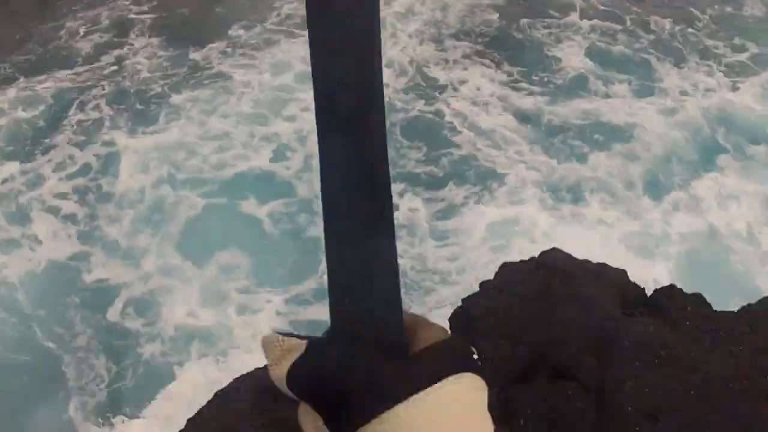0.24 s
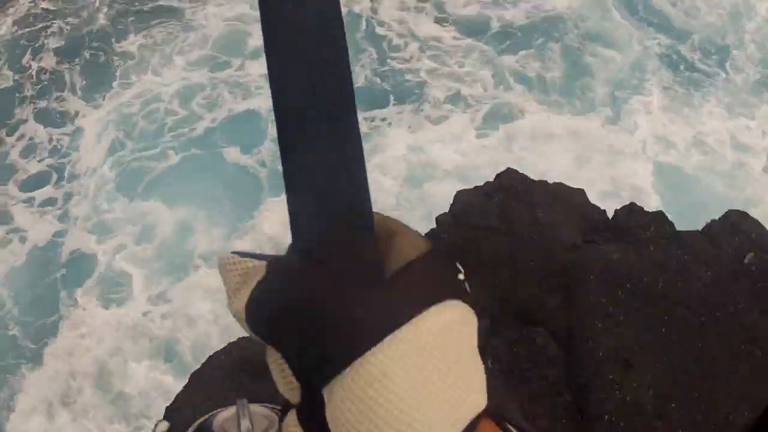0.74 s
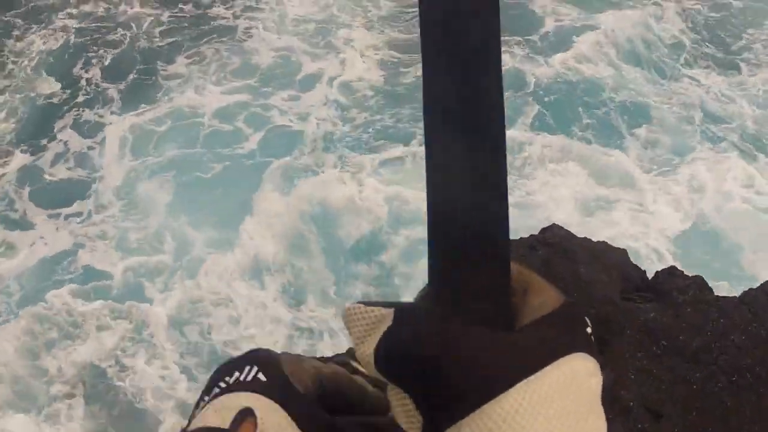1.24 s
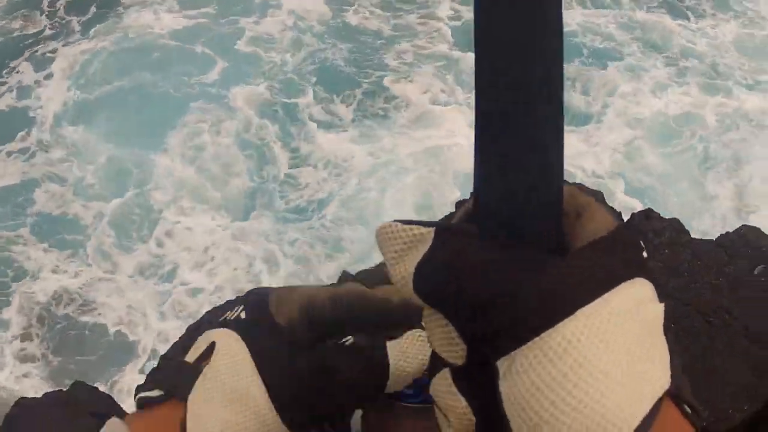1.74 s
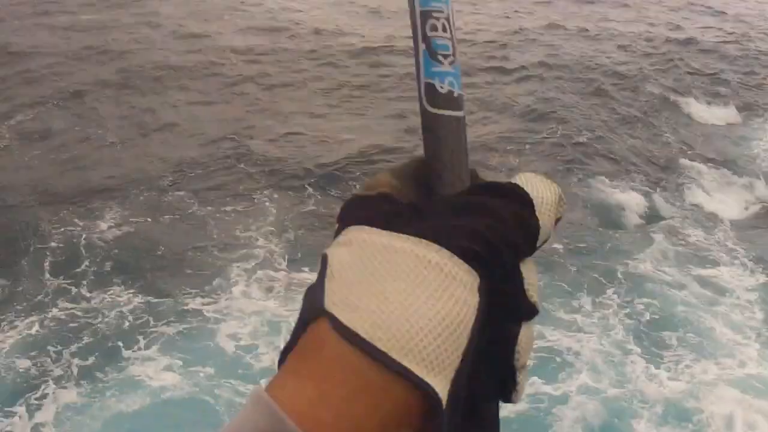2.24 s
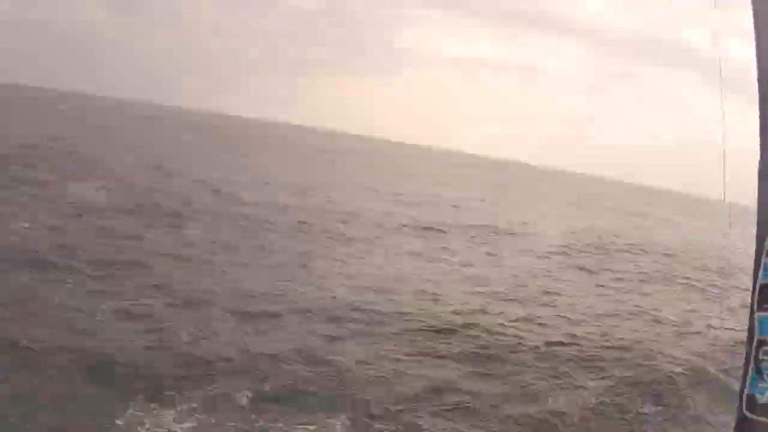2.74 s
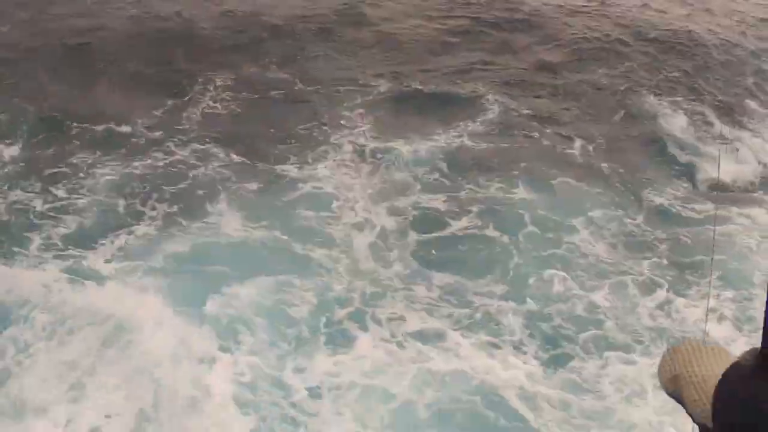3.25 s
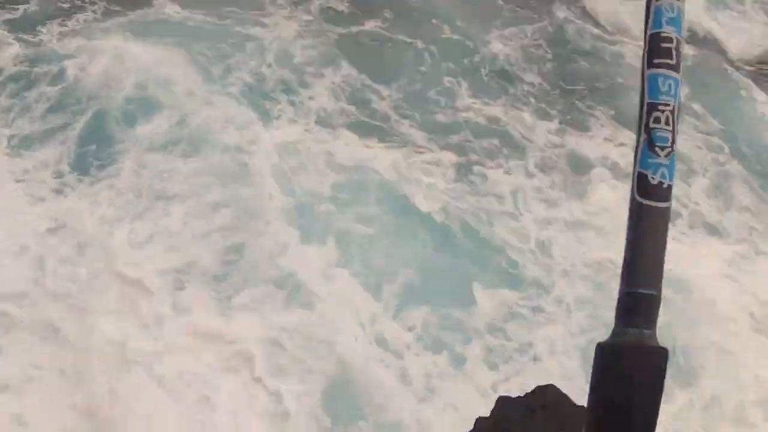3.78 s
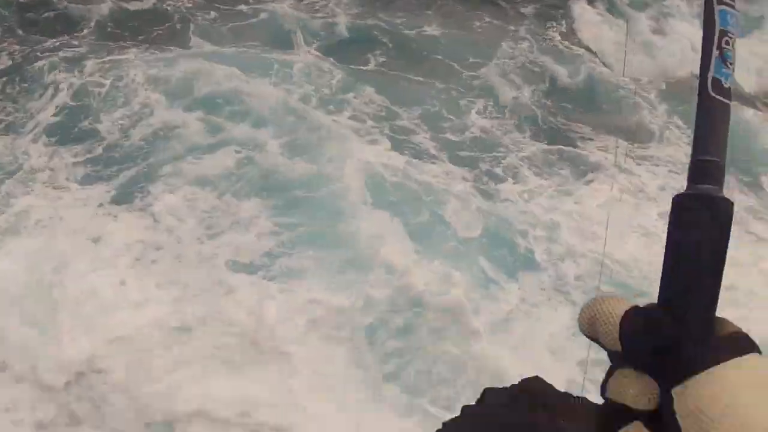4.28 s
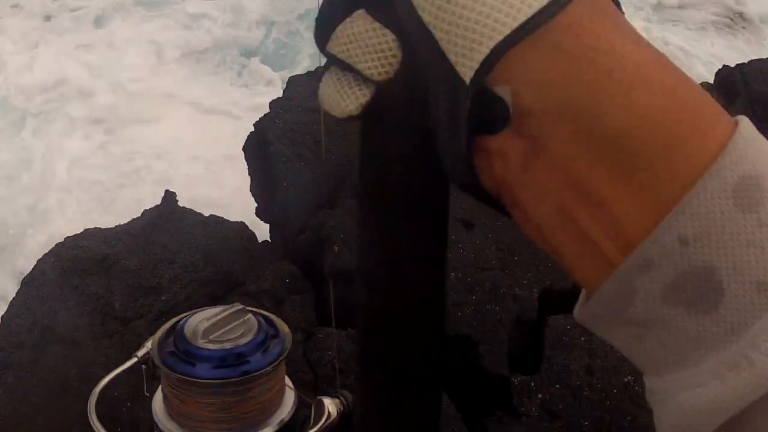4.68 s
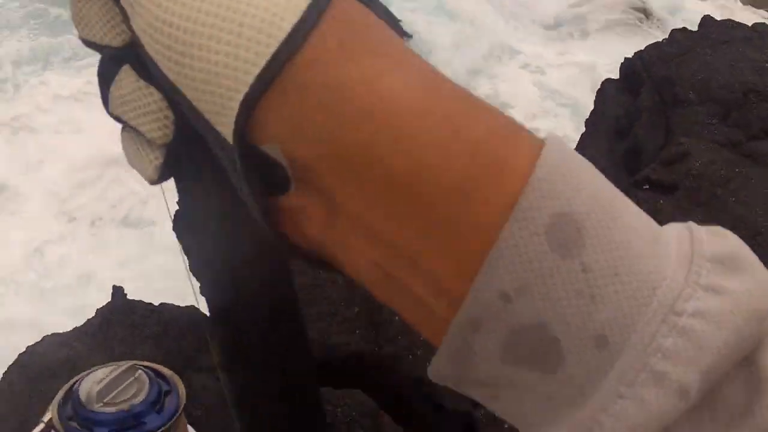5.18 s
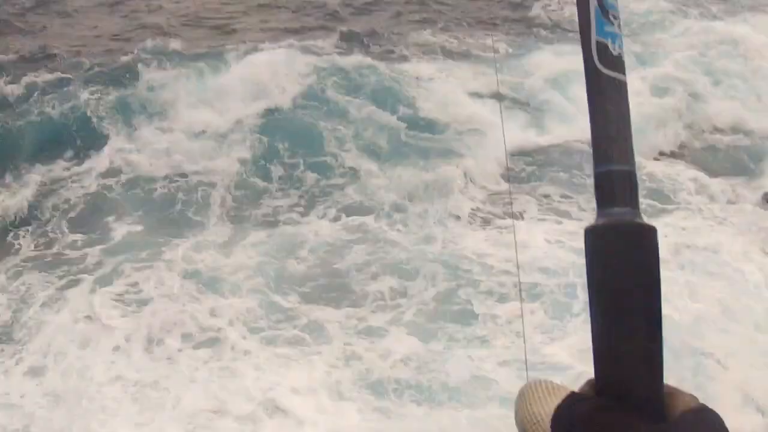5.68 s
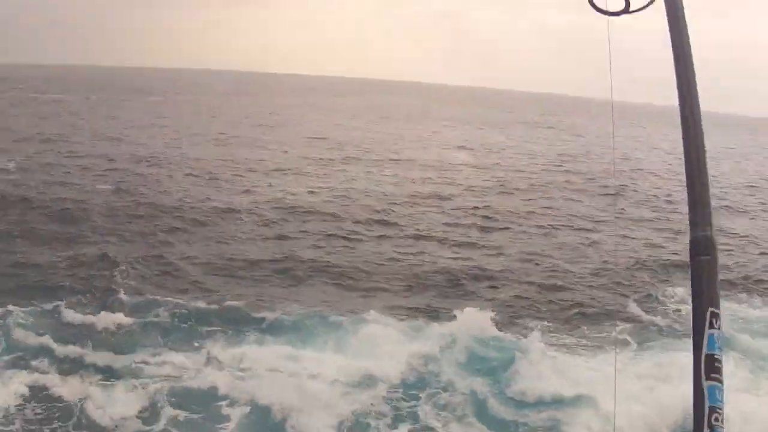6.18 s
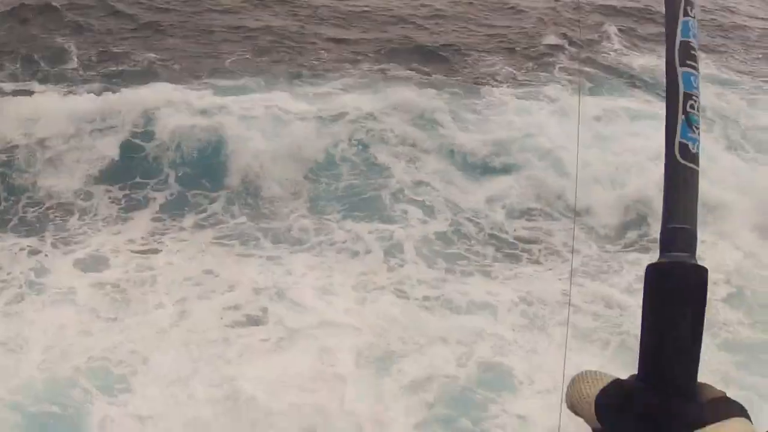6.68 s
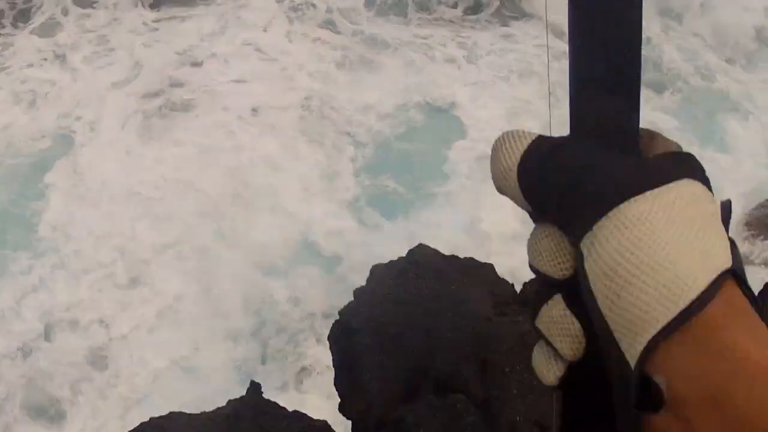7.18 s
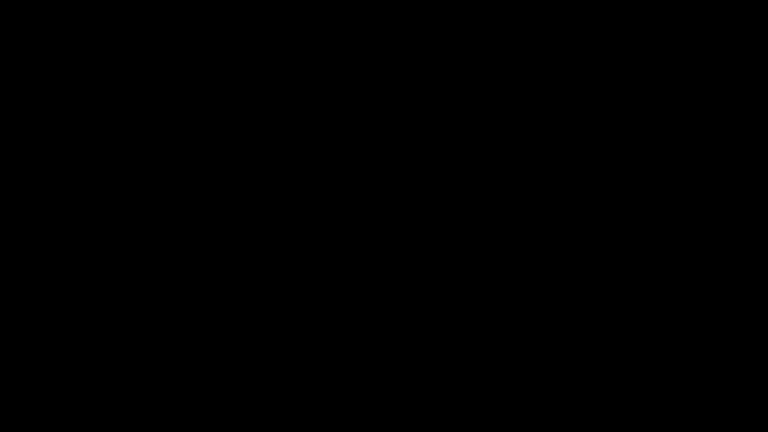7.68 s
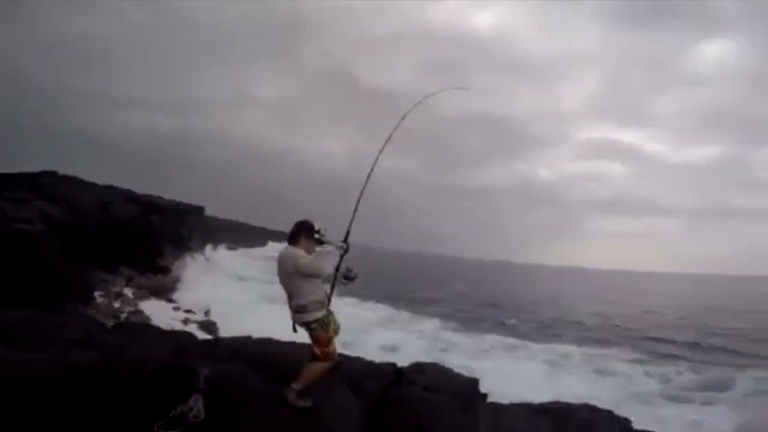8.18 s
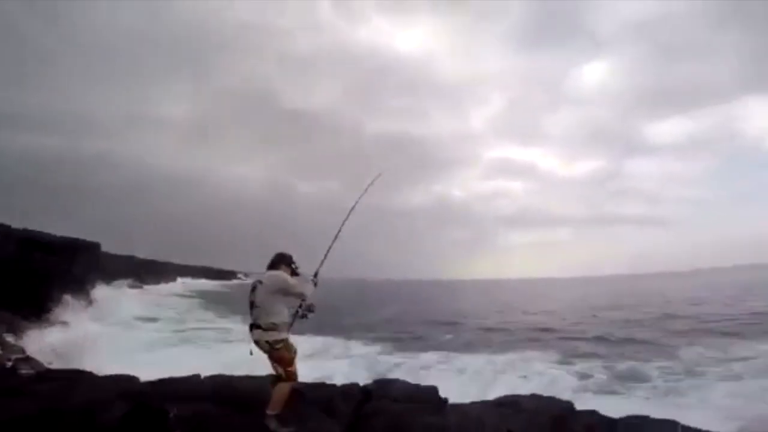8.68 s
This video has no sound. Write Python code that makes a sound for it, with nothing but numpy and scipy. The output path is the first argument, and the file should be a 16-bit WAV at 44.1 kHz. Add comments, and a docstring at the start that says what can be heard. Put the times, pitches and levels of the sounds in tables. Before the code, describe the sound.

Close, irregular knocks and rattles of a plastic camera case sound over churning, foaming sea as a fishing rod is handled on the rocks. The reel ticks lightly, a glove rubs and a breeze rumbles on the microphone. Then an abrupt change to a second microphone further back brings heavy low gusts over muffled surf, two thin whirrs and some close taps, ending with a rod swishing through the air.

```python
"""Rocky shore, microphone inside the plastic case of a camera worn by an angler. The surf just below
draws back, then slowly builds, as churning water and hissing foam. Right at the microphone the case
knocks and rattles on its mount as the rod is handled; the reel ticks and a light wind rumbles.
At 7.7 s we cut to a second camera on the rocks, further from the water: duller surf, hard wind
buffets, a thin whirr, a few taps and, at the very end, the swish of a cast."""
import sys
import numpy as np
from scipy import signal
from scipy.fft import rfft, irfft, next_fast_len
from scipy.io import wavfile
from scipy.ndimage import uniform_filter1d

SR = 44100
rng = np.random.default_rng(int(sys.argv[2]) if len(sys.argv) > 2 else 0)


def put_to_file(sound):
    """Save the sound as 16-bit audio at rate SR, in the file named by the first command-line argument."""
    columns = np.atleast_2d(sound).T  # one column per channel
    safe = np.clip(columns, -1, 1)
    whole_steps = np.round(safe * 32767)
    wavfile.write(sys.argv[1], SR, whole_steps.astype(np.int16))


N = 393807

# near surf drawing back and building: t/s, churn level/dB, foam level/dB
SURF_LEVELS = [(0.3, -56.5, -54.5), (0.6, -59, -56.5), (1.6, -58.5, -58), (3.3, -57, -57),
               (4.4, -56, -55.5), (5.15, -54.5, -53.2), (6.3, -53.6, -52.6), (7.25, -51.5, -50.5),
               (7.69, -52.6, -51.8)]
# spectrum of the near surf: f/Hz, level/dB
SURF_COLOUR = [(20, -25), (60, -27), (100, 5), (330, 2), (600, -8), (1000, -8.5), (1500, -4), (2600, -2.5),
               (4200, -12), (9000, -18.5), (12000, -18.5), (15000, -18)]
# peaks and notches of the worn camera's case: f/Hz, width/Hz, gain/dB
WORN_CASE = [(1276, 136, 6), (1827, 220, 4.3), (2285, 190, 6.3), (2900, 140, 2.5), (3130, 130, 3),
             (3704, 63, 5.5), (4080, 425, -7.5), (6000, 573, -17), (7830, 300, -8.5), (9870, 1670, 9),
             (11900, 2360, -15.5), (14000, 990, 6)]
# spectrum of the surf from further back: f/Hz, level/dB
FAR_SURF_COLOUR = [(60, 9), (250, 3.5), (600, -2), (1100, -3), (2200, 1), (3300, 0.5), (4300, -1.5),
                   (4900, -11), (6500, -11.5), (9500, -17), (12000, -22.5), (15000, -28)]
# resonances of the camera on the rocks: f/Hz, width/Hz, gain/dB
ROCK_CASE = [(830, 150, 2), (1442, 116, 10), (1930, 100, 5.5), (2680, 110, 3), (3980, 410, 0.5),
             (5350, 500, 5.5)]
# thin whirrs: middle t/s, level over the surf/dB
WHIRR_SWELLS = [(8.02, 8.5), (8.39, 6)]
# the case knocking on its mount: t/s, relative clack level/dB, relative thud level/dB
CASE_KNOCKS = [(0.0554, -25, -28.5), (.1845, -30.5, -24.5), (.1975, -30.5, -38), (.262, -25, -30),
               (.271, -22, -25.5), (0.3204, -35, -25), (.3826, -28, -32), (0.3963, -31, -30.5),
               (0.8289, -30.5, -35.5), (0.8495, -29, -31.5), (1.1097, -37, -39.5), (2.2971, -31, -35.5),
               (2.499, -30.5, -30.5), (3.088, -28.5, -34.5), (3.1805, -28.5, -32.5), (3.2336, -39.5, -37),
               (3.295, -36.5, -43), (3.3957, -27, -33.5), (3.5454, -28.5, -29.5), (3.6485, -29, -31),
               (3.7194, -36.5, -28), (3.9026, -35.5, -40), (4.1556, -18.5, -23.5), (4.2513, -38, -34),
               (4.2874, -32.5, -37), (5.7118, -30, -34), (5.7294, -27, -28), (5.8435, -37, -30),
               (5.9204, -22.5, -27), (5.927, -18.5, -20.5), (6.2323, -28.5, -30), (6.5365, -29.5, -40),
               (6.582, -34, -30.5), (6.6334, -22, -24.5), (6.6967, -33.5, -30), (6.7484, -27.5, -30),
               (6.9001, -34, -42), (7.0752, -28.5, -35), (7.092, -25, -26), (7.1618, -33.5, -26),
               (7.283, -23.5, -26.5), (7.3483, -39, -30.5), (7.4016, -32.5, -43), (7.4744, -34.5, -42),
               (7.6111, -34, -40.5)]
# spectrum of a clack: f/Hz, level/dB
CLACK_COLOUR = [(300, -22), (640, -25), (810, -1), (1130, -4), (1400, 1), (1780, -6), (2200, -0.5),
                (2500, -13.5), (3200, -20.5), (4200, -30.5), (8000, -41), (9800, -17.5), (11500, -21),
                (14200, -20.5)]
# ringing and notches of the knocked plastic shell: f/Hz, width/Hz, gain/dB
SHELL_MODES = [(930, 210, 0.5), (1416, 89, 2), (2060, 300, 1.5), (6000, 2000, -8), (9930, 220, 4.5),
               (11400, 380, -18), (11800, 90, 9), (12000, 330, -14), (12280, 90, 8), (12500, 380, -16),
               (14130, 200, 7), (15000, 530, -15)]
# the body shoving the camera: t/s, level/dB, f/Hz
BODY_SHOVES = [(0.107, -12, 42), (0.226, -24, 34), (.79, -32, 35.3), (1.29, -34, 41), (2.221, -28.5, 29.8),
               (2.461, -29, 31.4), (3.85, -28, 32), (5.838, -31, 70), (5.885, -20, 26.5), (6.573, -15, 29),
               (6.608, -19, 35.4)]
# the glove rubbing along the rod: t/s, length/s, level/dB
GLOVE_RUBS = [(.062, 0.039, -41.5), (.19, 0.042, -37), (.32, 0.028, -40), (.41, 0.087, -47.5),
              (.87, .035, -47), (2.62, 0.054, -43.5), (3.82, 0.065, -45.5), (5.845, .05, -37.5)]
# spectrum of a rub: f/Hz, level/dB
RUB_COLOUR = [(100, -9), (300, -0.5), (620, -24), (1300, -11), (2100, 2), (3000, -41), (6000, -34),
              (10000, -19), (12000, -28), (14200, -25)]
# light metal ticks of the reel: t/s, level/dB
REEL_TICKS = [(.367, -35), (0.435, -48.5), (.514, -36.5), (0.636, -47.5), (7.051, -32)]
# spectrum of a tick: f/Hz, level/dB
TICK_COLOUR = [(1500, -33), (2600, -13), (3050, 7), (3400, -9), (3650, -5.5), (4200, -17), (5100, 3.5),
               (6000, -24), (7000, 0), (7900, -29), (8900, -5), (12000, -32)]
# the reel's metal ringing on: f/Hz, level against the tick/dB, t60/s
REEL_MODES = [(3000, -9.5, 0.18), (5160, -16, 0.18), (6760, -15, 0.16), (8995, -19, .15)]
# spectrum of the rod's swish: f/Hz, level/dB
SWISH_COLOUR = [(350, -24), (520, -0.5), (1050, 3.5), (1450, -5), (1800, 0), (2300, -11), (2750, 3),
                (3200, -14), (3800, 1), (4350, -2), (5200, -20.5), (7000, -24.5), (10500, -25),
                (15000, -31)]
# taps close to the camera on the rocks: t/s, level/dB
CLOSE_TAPS = [(8.1008, -26), (8.318, -27.5), (8.559, -36), (8.578, -24.5)]
# spectrum of a tap: f/Hz, level/dB
TAP_COLOUR = [(120, 7.5), (300, 1), (600, -3), (950, 8), (1400, -15), (2100, -3), (2800, -9), (5000, -17),
              (14000, -48)]
# hard wind buffets on the rocks: t/s, level/dB
GALE_BUFFETS = [(7.74, -21.5), (7.84, -13.5), (7.96, -19.5), (8.055, -16.5), (8.122, -14.5), (8.245, -15.5),
                (8.32, -13), (8.599, -14), (8.7, -12.5), (8.77, -17), (8.832, -13.5), (8.92, -14.5)]
# spectrum of the hard wind: f/Hz, level/dB
GALE_COLOUR = [(10, -1.5), (22, 1.5), (35, 2.5), (48, -5.5), (70, -18), (110, -28.5), (200, -40),
               (500, -63), (2000, -92)]
# gusts slapping the camera on the rocks: t/s, length/s, level/dB
GUST_SLAPS = [(8.303, 0.016, -26), (8.826, 0.028, -27), (8.88, 0.031, -25.5)]
# spectrum of a slap: f/Hz, level/dB
SLAP_COLOUR = [(40, -7), (110, 1), (200, -9.5), (400, -29.5), (1500, -24.5), (6000, -62)]
# light wind on the worn case, with its lulls: t/s, level/dB
BREEZE_LEVELS = [(0, -35), (.22, -28.5), (.64, -49), (.95, -42), (1.75, -44.5), (2.3, -39.5), (2.8, -47),
                 (3.15, -36), (4.95, -42.5), (5.27, -36), (5.45, -52), (5.85, -36), (6.35, -41),
                 (7.69, -39)]
# spectrum of the light wind: f/Hz, level/dB
BREEZE_COLOUR = [(10, -3), (22, 4.5), (36, -0.5), (55, -12.5), (90, -17), (160, -29), (400, -44),
                 (1500, -90)]

CUT_S = 7.696  # from the worn camera to the one on the rocks
LEAD_S = 0.015  # run-up of a clack before its blow


def near_surf():
    """Just below the angler, white water churns in the middle range and foam hisses on top."""
    t, hz = frames()
    colour = spectrum(SURF_COLOUR, hz) + bells(WORN_CASE, hz)
    foam = np.clip((hz - 2200) / 2200, 0, 1)
    level = (1 - foam) * curve(SURF_LEVELS, t) + foam * curve(SURF_LEVELS, t, column=2)
    return churn(colour + level, patchy_db=0.54, flicker_db=0.62)


def far_surf(level_db=-57.5, whirr_hz=3870, sag_hz_per_s=1600, width_hz=540, spread_s=0.22):
    """The same sea from further back, steady; a thin whirr rises out of it twice, sinking in pitch."""
    t, hz = frames()
    whirrs = [(whirr_hz - sag_hz_per_s * (t - s), width_hz, db * np.exp(-((t - s) / spread_s) ** 2))
              for s, db in WHIRR_SWELLS]
    colour = spectrum(FAR_SURF_COLOUR, hz) + bells(ROCK_CASE, hz)
    return churn(colour + bells(whirrs, hz) + level_db, patchy_db=1.6, flicker_db=0.56)


def churn(field_db, patchy_db, flicker_db, size=512):
    """Water noise on a time-frequency grid: patches of bursting foam and quick, wide-band splashes."""
    real, imag, patches, splashes = rng.standard_normal((4,) + field_db.shape)
    patches = unit_rms(uniform_filter1d(uniform_filter1d(patches, size=26, axis=0), size=7, axis=1))
    splashes = unit_rms(uniform_filter1d(uniform_filter1d(splashes, size=4, axis=0), size=50, axis=1))
    water = (real + 1j * imag) * gain_of(field_db + patchy_db * patches + flicker_db * splashes)
    return signal.istft(water.T, nperseg=size, noverlap=size - size // 4)[1][:N]


def knocks(thud_boost_db=4, thud_hz=265.4, thud_t60=0.066):
    """Right at the microphone, each knock clacks the shell and sets the camera ringing low on its mount."""
    out, t = np.zeros(N), np.arange(SR // 6) / SR
    for s, clack_db, thud_db in contacts():
        hit = clack(CLACK_COLOUR, contact_s=0.0011, rattle_db=-10, rattle_s=0.0094)
        add(out, s - LEAD_S, gain_of(clack_db) * hit)
        softness = 1 + 0.0085 * min(clack_db - thud_db, 0)  # soft blows ring lower
        hz = thud_hz * rng.uniform(0.94, 1.034) * softness
        thud = np.sin(2 * np.pi * hz * t) * gain_of(-60 * t / thud_t60)
        add(out, s - 0.0006, -gain_of(thud_db + thud_boost_db) * thud)
    return out


def contacts(touch_db=-12.5, touch_lead_s=0.014):
    """Case and mount meet twice each time: a light first touch, then the knock."""
    for s, clack_db, thud_db in CASE_KNOCKS:
        yield s - touch_lead_s, clack_db + touch_db, thud_db + touch_db
        yield s, clack_db, thud_db


def clack(colour, contact_s, rattle_db, rattle_s):
    """Hard parts chatter for a moment, then buzz faintly; the blow comes at LEAD_S, at level one."""
    t = np.arange(SR // 10) / SR - LEAD_S
    since = np.maximum(t, 0) / contact_s
    chatter = rfft((since * np.exp(1 - since)) ** 2 * rng.standard_normal(len(t)))
    blow = irfft(chatter / (abs(chatter) + 1e-9) ** 0.49, len(t))  # a hard blow has a flatter spectrum
    blow_level = np.sqrt(uniform_filter1d(blow ** 2, size=60).max())
    buzz = np.exp(np.minimum(t / 0.003, -t / rattle_s)) * rng.standard_normal(len(t))
    sound = coloured(blow + gain_of(rattle_db) * blow_level * buzz, colour)
    return sound / np.sqrt(uniform_filter1d(sound ** 2, size=90).max())


def sways(level_db=-35.5, hz=27, lead_s=0.019, width_s=0.021):
    """Before each knock the case swings out and back towards its stop."""
    out, t = np.zeros(N), np.arange(-SR // 16, SR // 16) / SR
    swing = -gain_of(level_db) * np.exp(-(t / width_s) ** 2) * np.sin(2 * np.pi * hz * t)
    for s, *_ in CASE_KNOCKS:
        add(out, s - lead_s + t[0], swing)
    return out


def shoves(decay_s=0.012):
    """A soft shove of the body rocks the case for a cycle or two."""
    out, t = np.zeros(N), np.arange(SR // 4) / SR
    push = t / decay_s * np.exp(1 - t / decay_s)
    for s, db, hz in BODY_SHOVES:
        add(out, s, -gain_of(db) * push * np.sin(2 * np.pi * hz * t))
    return out


def puffs(rows, colour, rough_db):
    """Short swells of uneven noise, from cloth that slips or air that tumbles."""
    out = np.zeros(N)
    for s, length, db in rows:
        count = max(int(length * SR), 256)
        slips = gain_of(rough_db * unit_rms(uniform_filter1d(rng.standard_normal(count), size=100)))
        sound = unit_rms(coloured(slips * rng.standard_normal(count), colour)[:count])
        add(out, s, gain_of(db) * sound * signal.windows.tukey(count, 0.5))
    return out


def reel():
    """Within arm's reach the reel ticks, and each tick leaves a faint metallic ring."""
    out = hits(REEL_TICKS, TICK_COLOUR, contact_s=0.0025, rattle_db=-8.5, rattle_s=0.028)
    t = np.arange(SR // 4) / SR
    ring = sum(gain_of(db - 60 * t / t60) * np.sin(2 * np.pi * hz * t) for hz, db, t60 in REEL_MODES)
    for s, db in REEL_TICKS:
        add(out, s, gain_of(db) * ring)
    return out


def hits(rows, colour, contact_s, rattle_db, rattle_s):
    """Small hard contacts of one object, close and dry."""
    out = np.zeros(N)
    for s, db in rows:
        add(out, s - LEAD_S, gain_of(db) * clack(colour, contact_s, rattle_db, rattle_s))
    return out


def cast(peak_s=8.921, peak_db=-21, rise_db_per_s=392, fall_db_per_s=700):
    """Heard from the rocks, air tears round the rod and line as the swing gathers speed."""
    t = np.arange(N) / SR - peak_s
    air = steady_noise(lambda hz: spectrum(SWISH_COLOUR, hz) + bells(ROCK_CASE, hz))[:N]
    level = peak_db + np.minimum(rise_db_per_s * t, -fall_db_per_s * t)
    return air * gain_of(np.maximum(level, -120))


def wind(gusts, colour, steadiness):
    """Eddies push on the microphone, following the gusts; steadiness (0 to 1) evens out their flutter."""
    eddies = steady_noise(lambda hz: spectrum(colour, hz))
    flutter = uniform_filter1d(abs(signal.hilbert(eddies)), size=1900)
    return unit_rms(eddies / flutter ** steadiness)[:N] * gusts


def gale_strength(steady_db=-26.5, rise_s=0.02, fall_s=0.045):
    """On the rocks, buffets swell quickly and die more slowly over a steady blow."""
    t = np.arange(N) / SR
    buffets = [gain_of(db) * np.exp(-np.maximum((s - t) / rise_s, (t - s) / fall_s))
               for s, db in GALE_BUFFETS]
    return np.sqrt(gain_of(steady_db) ** 2 + np.sum(np.square(buffets), axis=0))


def steady_noise(db_at):
    """Noise of rms one; db_at gives its spectrum at any frequency."""
    size = next_fast_len(N, True)
    gains = gain_of(db_at(np.fft.rfftfreq(size, 1 / SR)))
    return unit_rms(irfft(rfft(rng.standard_normal(size)) * gains, size))


def causal(x, db_at, size=4096):
    """A filter that rings only after the sound; db_at gives its gain at any frequency."""
    log_gain = np.log(gain_of(db_at(abs(np.fft.fftfreq(size, 1 / SR)))))
    response = np.fft.ifft(np.exp(np.conj(signal.hilbert(log_gain)))).real
    return signal.fftconvolve(x, response[:size // 2])


def coloured(x, colour):
    """Filters a sound by a spectrum table."""
    return causal(x, lambda hz: spectrum(colour, hz))


def spectrum(colour, hz):
    """A spectrum table in dB, joined on a log-frequency axis."""
    f, db = np.transpose(colour)
    return np.interp(np.log(hz + 1), np.log(f + 1), db)


def bells(modes, hz):
    """The dB response of a set of peaks and notches."""
    return sum(db * np.exp(-2 * ((hz - f) / width) ** 2) for f, width, db in modes)


def curve(rows, t, column=1):
    """One column of a timed table, read at the times t."""
    return np.interp(t, np.array(rows)[:, 0], np.array(rows)[:, column])


def frames(size=512):
    """Times (a column) and frequencies (a row) of the short-time grid."""
    hop = size // 4
    return np.arange(N // hop + 5)[:, None] * hop / SR, np.fft.rfftfreq(size, 1 / SR)


def add(mix, s, sound):
    """Mixes a sound in at s seconds."""
    part = mix[max(round(s * SR), 0):][:len(sound)]
    part += sound[:len(part)]


def gain_of(db):
    """Decibels to amplitude."""
    return 10 ** (np.asarray(db) / 20)


def unit_rms(x):
    """Scales to an rms of one."""
    return x / np.sqrt(np.mean(x ** 2) + 1e-20)


def scene():
    """Mono: the microphone on the angler, then the one on the rocks."""
    t = np.arange(N) / SR
    handling = knocks() + puffs(GLOVE_RUBS, RUB_COLOUR, rough_db=1.3)
    through_shell = causal(handling, lambda hz: bells(SHELL_MODES, hz))[:N]
    ticks = reel()
    breeze = wind(gain_of(curve(BREEZE_LEVELS, t)), BREEZE_COLOUR, steadiness=0.24)
    on_angler = near_surf() + through_shell + sways() + shoves() + ticks + breeze
    taps = hits(CLOSE_TAPS, TAP_COLOUR, contact_s=0.0014, rattle_db=-15, rattle_s=0.008)
    sea = far_surf()
    gale = wind(gale_strength(), GALE_COLOUR, steadiness=0.87)
    slaps = puffs(GUST_SLAPS, SLAP_COLOUR, rough_db=3.3)
    on_rocks = sea + cast() + taps + gale + slaps
    cut = np.clip((t - CUT_S) / 0.004, 0, 1)
    return ((1 - cut) * on_angler + cut * on_rocks)[None]


def record(dry):
    """Both cameras pass nothing much above 15.4 kHz."""
    lowpass = signal.firwin(511, 15400, window=("kaiser", 9), fs=SR)
    return signal.oaconvolve(dry, lowpass[None], "same")


dry = scene()
out = record(dry)
put_to_file(out)
```